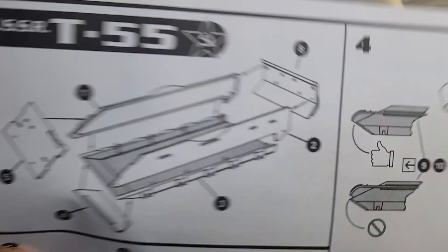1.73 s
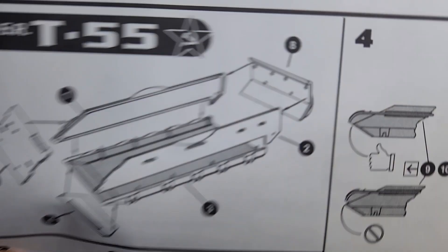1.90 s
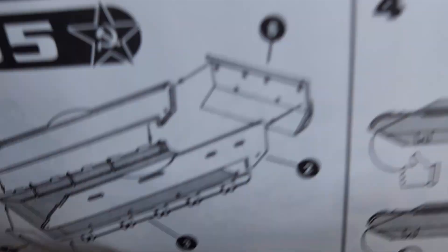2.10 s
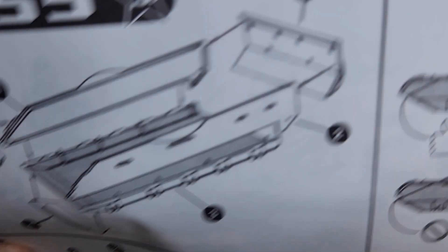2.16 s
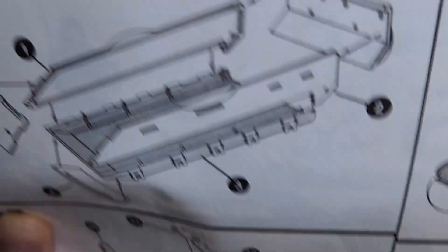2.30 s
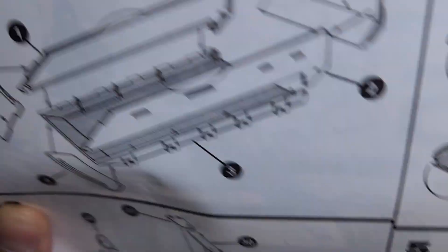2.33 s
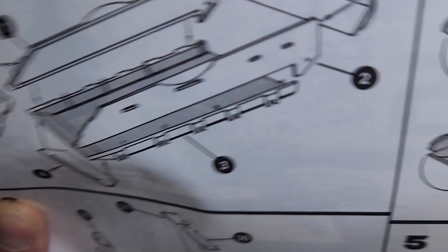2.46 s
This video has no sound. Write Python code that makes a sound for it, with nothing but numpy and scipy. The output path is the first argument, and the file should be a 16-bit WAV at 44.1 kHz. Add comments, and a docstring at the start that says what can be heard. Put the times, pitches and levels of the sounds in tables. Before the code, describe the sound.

Close paper scrapes softly, crackles and snaps loudly as it is opened, then settles into light finger rubbing in a quiet room.

```python
"""A folded paper sheet is handled close to two microphones in a quiet room.
First, fingers scrape softly over it, creases crackle and a taut panel hums, while the moving sheet
pushes low air over the room's faint hiss. From 1.4 s the rubbing grows firmer and panels buckle with
loud pops, in two bouts. After 4.3 s the fingers scrape lightly on the open, held sheet,
and a few last crackles come near 6.2 s."""
import sys
import numpy as np
from scipy import signal
from scipy.fft import rfft, irfft, next_fast_len
from scipy.io import wavfile
from scipy.ndimage import uniform_filter1d, map_coordinates

SR = 44100
rng = np.random.default_rng(int(sys.argv[2]) if len(sys.argv) > 2 else 0)


def wav_out(sig):
    """Save sig, one row per channel (or a flat mono array), as 16-bit PCM at SR to the path in sys.argv[1]."""
    wavfile.write(sys.argv[1], SR, np.round(np.clip(np.atleast_2d(sig).T, -1, 1) * 32767).astype(np.int16))


N = 282240
SIDES = np.array([[.5], [-.5]])  # splits a left-right difference between the two channels


def amp(db):
    return 10 ** (np.asarray(db) / 20)


def unit_rms(x):
    return x / np.sqrt(np.mean(x ** 2) + 1e-20)


def along(points, hz):
    """Read between (Hz, value) points on a log frequency axis."""
    f, v = np.transpose(points)
    return np.interp(np.log(hz + 1), np.log(f + 1), v)


def wobble(rate, count):
    """A smooth curve through `rate` random values a second."""
    knots = rng.standard_normal(int(count * rate / SR) + 4)
    return map_coordinates(knots, [np.arange(count) * rate / SR])


def filtered(x, response):
    """Scale and delay each frequency of x as `response` says."""
    m = next_fast_len(x.shape[-1] + 4096)
    return irfft(rfft(x, m) * response(np.fft.rfftfreq(m, 1 / SR)), m)[..., :x.shape[-1]]


def ring(f, hz, sharp):
    """One resonance, with gain 1 at its centre."""
    return 1j * f * hz / sharp / (hz * hz - f * f + 1j * f * hz / sharp)


def left_later(f, ms):
    return np.exp(-2j * np.pi * f * ms / 1000 * SIDES)


def spaced(pair, ms):
    """Two noises become a left and a right that are partly alike, the left ms later."""
    # Each row: frequency in Hz, how alike the sides are from 0 to 1.
    likeness = [(60, 0.87), (300, 0.88), (1000, 0.61), (4000, 0.14), (12000, 0.088)]
    turn = lambda f: np.arccos(np.clip(along(likeness, f), 0, 1)) / 2
    mid, side = filtered(pair, lambda f: np.array([np.cos(turn(f)), np.sin(turn(f))]))
    return filtered(np.array([mid + side, mid - side]), lambda f: left_later(f, ms))


def patchy(pair, db, size):
    """Make random patches of time and frequency louder or softer."""
    spectra = signal.stft(pair, nperseg=size)[2]
    patches = uniform_filter1d(uniform_filter1d(rng.standard_normal(spectra.shape[1:]), 3, 0), 6, 1)
    return signal.istft(spectra * amp(db * unit_rms(patches)), nperseg=size)[1][:, :pair.shape[1]]


def add(track, sound, start):
    place = track[:, max(round(start * SR), 0):][:, :sound.shape[1]]
    place += sound[:, :place.shape[1]]


def rub(times, scrape_db, fizz_db, sizzle_db, flex_db, pan_db):
    """Fibres catch and slip in clumps: a scrape, a bright fizz, a top sizzle and low flexing."""
    # Tone colours. Each row: frequency in Hz, gain in dB.
    folded_scrape = [(290, -35), (500, -10), (603, 1), (913, 0.5), (1410, 7), (1760, 2.5), (1930, 6.5),
                     (2510, -0.5), (3070, -11), (3320, -17.5), (3800, -15), (4940, -38), (8360, -120)]
    open_scrape = [(290, -42), (500, -16), (600, -9), (802, -3.5), (1010, -5.5), (1250, -1), (1430, 4),
                   (1620, -2), (2100, -3.5), (2570, -9.5), (2950, -8), (3500, -40), (5300, -45),
                   (11000, -120)]
    fizz = [(1880, -22), (3200, -5.5), (3690, -7.5), (4480, -2), (4980, -6), (5500, -4), (5900, -10),
            (6400, -6.5), (7460, -6), (8210, -8), (9500, -16.5), (12400, -36), (20900, -120)]
    sizzle = [(5590, -28), (9300, -11.5), (10000, -4), (11000, -1.5), (11900, 1.5), (15100, 3.5),
              (16100, -8), (16400, -18)]
    flex = [(82, -27), (140, -1.5), (227, -6), (367, -2), (415, -9), (800, -11), (1040, -36.5),
            (1760, -120)]
    # Where the fingers are. Each row: time in seconds, delay of the left side in ms.
    lags = [(0, .05), (.2, .35), (.67, .1), (.84, .4), (1.41, .4), (1.54, -.35), (1.59, .35), (3.4, .45),
            (3.66, -.1), (3.8, .18), (4.3, -.07), (4.9, .2), (5.1, -.08), (6.4, -.1)]
    # Bending tilts the scrape. Each row: time in seconds, boost of its highs against its lows in dB.
    tilts = [(0, -13), (.1, 1), (.4, 1), (.68, 0.5), (1.08, 4.5), (1.1, -15), (1.2, 5.5), (1.57, -3.5),
             (1.62, 1.5), (1.7, 1), (1.76, 3.5), (1.93, -2.5), (1.98, 1), (2.05, 2.5), (2.1, -1),
             (2.35, -1), (2.46, -2), (2.81, 4), (2.83, -4.5), (2.86, -8), (3.15, -1), (3.28, -3),
             (3.34, -3), (3.44, -1), (3.47, -6), (3.52, 0), (3.58, -3), (3.68, 1), (3.8, -8), (3.9, 7.5),
             (4.6, -1.5), (4.94, 1.5), (5.4, 0), (5.93, 0.5), (6.4, 0)]
    bite_s, lift_s, open_from_s, split_hz = .005, .045, 4.28, 1410
    start, end = times[0], times[-1]
    count = round((end - start) * SR) + 2048
    t = start + np.arange(count) / SR
    scrape_db, fizz_db, sizzle_db, flex_db = (
        np.interp(t, times, db) for db in (scrape_db, fizz_db, sizzle_db, flex_db))
    contact = np.clip((t - start) / bite_s, 0, 1) * amp(-60 * np.maximum(t - end, 0) / lift_s)
    force = np.clip((scrape_db + 68) / 35, .25, 1)  # a light touch slides, a firm one stutters
    clumps = amp(force * (.6 * wobble(60, count) + 1.1 * wobble(200, count) + 2.2 * wobble(900, count)))
    grit = patchy(unit_rms(clumps * rng.standard_normal((2, count))), db=1.3, size=256)
    grit = patchy(grit, db=3, size=1024)  # the bent sheet's resonances
    grit = spaced(grit, np.interp(start, *np.transpose(lags)))
    side_db = SIDES * pan_db
    scrape_colour = open_scrape if start > open_from_s else folded_scrape
    scrape = unit_rms(filtered(grit, lambda f: amp(along(scrape_colour, f))))
    lows = filtered(scrape, lambda f: 1 / (1 + (f / split_hz) ** 4))
    tilt = amp(np.interp(t, *np.transpose(tilts)) / 2)
    sound = amp(side_db) * (lows / tilt + (scrape - lows) * tilt)
    for colour, db, pan_share in (fizz, fizz_db, .38), (sizzle, sizzle_db, .21), (flex, flex_db, 1):
        layer = unit_rms(filtered(grit, lambda f: amp(along(colour, f))))
        sound += amp(db + pan_share * side_db) * layer
    return sound * contact * amp(scrape_db)


def rubbing():
    """Fingers and folds scrape the sheet in sudden strokes, over two long, light slides."""
    # Each row: start, crest and end in seconds, the scrape's level at each in dB, then fizz, sizzle
    # and flexing in dB over the scrape at the crest, left over right in dB.
    strokes = [ (0, 0.003, 0.089, -38, -51, -89, -8, -34, 4.5, 4),
               (0.091, .11, 0.13, -69, -70, -74, 1.5, -16, -6, -8),
               (.128, .13, 0.18, -49, -47.5, -89, -7, -24, -26, -6),
               (0.196, 0.27, 0.35, -57, -54, -85, -3.5, -26, -11, -5.5),
               (.392, 0.4, .46, -55, -52, -94, -5, -28, -20, -6),
               (0.466, .47, 0.6, -80, -78, -89, 6, -10, -4, 8),
               (0.611, 0.65, 0.69, -70, -52, -73, -9.5, -23, -13, -5),
               (0.668, 0.71, 0.71, -51, -48, -53, 2.5, -0.5, -5, -2.5),
               (0.71, 0.72, 0.75, -56, -57.5, -69, -7, -16, 3, -1),
               (.75, 0.79, 0.83, -71, -53, -79, -9.5, -25, 0.5, -4),
               (0.8361, 0.87, 0.91, -58, -48, -63.5, -2.5, -9.5, -3, -1.5),
               (.978, 0.96, 1, -52, -48.5, -58, -9, -15, -16, -4),
               (1.066, 1.075, 1.09, -45.5, -42, -50, -3, -19, -5.5, -4),
               (1.085, 1.1, 1.116, -49, -42.5, -46, -16, -23, 2, -4),
               (1.112, 1.25, 1.3, -55.5, -48.5, -61, 2.5, -4, -18, -3),
               (1.347, 1.385, 1.4, -46, -46.5, -52.5, 4, -2.5, -2, -0.5),
               (1.41, 1.444, 1.542, -45, -43, -59, -3.5, -10, -4.5, -3),
               (1.539, 1.57, 1.61, -38, -40, -44, -6, -14, -3.5, -2),
               (1.585, 1.625, 1.686, -26, -31.5, -38, -4, -12, -15.5, -2.5),
               (1.679, 1.698, 1.717, -32, -25.5, -33, -3.5, -15.5, -9, -4.5),
               (1.712, 1.74, 1.752, -34, -31.5, -30, -1.5, -12, -5, -3),
               (1.749, 1.782, 1.797, -28.5, -27.5, -28.5, 0, -8, -8, -1.5),
               (1.797, 1.8, 1.84, -32, -31.5, -40, -9.5, -16.5, -7.5, -2.5),
               (1.832, 1.87, 1.92, -39, -35.5, -52.5, -8, -16, -4, -5),
               (1.935, 1.953, 1.97, -39, -34.5, -36, -7, -11.5, -4, -2.5),
               (1.976, 1.988, 2.001, -27.5, -29.5, -31.5, 0, -10, -5.5, -2),
               (2.0, 2.002, 2.05, -38, -35.5, -42.5, -7.5, -15, -4.5, -2.5),
               (2.028, 2.042, 2.052, -42, -33.5, -37, -1.5, -11.5, -5.5, -2.5),
               (2.052, 2.05, 2.09, -47, -43.5, -50.5, -8, -21, 3, -3),
               (2.09, 2.12, 2.22, -55, -46.5, -60, -15, -24, 1.5, -6),
               (2.207, 2.27, 2.3, -50.5, -47.5, -55.5, 2, -3, -2, -4.5),
               (2.32, 2.323, 2.4, -35, -41, -67, 1.5, -6, -3.5, -4),
               (2.405, 2.45, 2.43, -67, -48.5, -63, 0, -10, 12.5, -4.5),
               (2.811, 2.825, 2.867, -33.5, -22, -60.5, -45, -52, -7, -10),
               (2.874, 2.866, 2.9, -51, -53, -67, -18, -18, 8, -2),
               (3.137, 3.18, 3.2, -50.5, -52.5, -69, 1.5, -9.5, -1, -12),
               (3.267, 3.274, 3.32, -23.5, -25, -35, -15, -28, -0.5, -4),
               (3.303, 3.34, 3.377, -30, -28, -31.5, -10, -20, -6.5, -6.5),
               (3.378, 3.43, 3.48, -40.5, -39, -48, -10, -18.5, -2.5, -3),
               (3.461, 3.466, 3.495, -30.5, -34, -43, -11, -24.5, -1.5, 6),
               (3.495, 3.514, 3.54, -23.5, -21.5, -26.5, -14, -25, -11, -4.5),
               (3.54, 3.595, 3.65, -32.5, -31.5, -43, -8.5, -15.5, -8.5, -3.5),
               (3.638, 3.676, 3.721, -40.5, -30.5, -38.5, -6, -15.5, -7, -3.5),
               (3.7, 3.725, 3.785, -46, -41, -54, -9, -18, -2, -3.5),
               (3.788, 3.802, 3.84, -45, -46.5, -58.5, 0.5, -4, 2, -1),
               (4.077, 4.127, 4.165, -54, -50, -62, 6.5, 5.5, -8.5, -3),
               (4.2, 4.26, 4.33, -66, -58, -60, 3.5, 1, -5, -4.5),
               (4.4, 4.57, 4.66, -62.5, -53, -71, -17, -26, -8, -2.5),
               (4.6, 4.66, 4.7, -63, -58, -61, -2, -18, -9.5, -2),
               (4.69, 4.765, 4.775, -63, -62, -70, -18, -35, -3, -2),
               (4.89, 4.9, 4.915, -62, -58, -58, -2, -9, -8, -3.5),
               (4.912, 4.925, 4.962, -50, -48.5, -53, -2, -9.5, -10.5, -3.5),
               (4.96, 4.987, 5.03, -60, -54, -72, 0, -7, -8, -3.5),
               (5.137, 5.2, 5.28, -64, -61, -62, -9, -32, -9, -2.5),
               (5.26, 5.295, 5.42, -64, -57.5, -61, -3, -28, -11, -2),
               (5.379, 5.385, 5.53, -55, -55.5, -58, -4, -20, -17, -2),
               (5.49, 5.54, 5.675, -59, -53.5, -58, -3, -25, -19, -1.5),
               (5.907, 5.93, 6.08, -64, -50.5, -52, -1, -11.5, -13.5, 0.5),
               (6.07, 6.105, 6.15, -58, -54, -66, -12, -22, -7.5, 0),
               (6.152, 6.2, 6.2, -53, -49.5, -53, -4.5, -10, -17, -1),
               (6.198, 6.222, 6.232, -51, -46.5, -49, 0, -14, -17.5, -8),
               (6.236, 6.3, 6.338, -57, -51, -53, -7, -17, -8.5, 0.5), ]
    # Each row of a slide: time in seconds, scrape in dB, then fizz, sizzle and flexing in dB over it.
    slides = [
        [(.86, -75, 2, -8, 13), (.91, -68.5, -6, -9, 12), (.97, -69.5, 3, -10, 2), (1.01, -62, 4, -5, -10),
         (1.3, -63.5, 1, -5, 2), (1.345, -68, 2, -2, -5), (1.89, -62, 1, -5, 0), (1.92, -66, 0, -9, 4),
         (1.95, -62, 2, -5, 0), (2.15, -62.5, 3.5, -8, 8), (2.19, -74, -7, -14, 13), (2.215, -65, 4, -5, 4),
         (2.4, -62.5, 7.5, -2, -2), (2.47, -56.5, 2, -3.5, 13.5), (2.657, -66.5, 4, -9, 3.5),
         (2.72, -63, 4.5, -4, -22), (2.9, -68.5, 6.5, 1.5, 2), (3.1, -75, 6.5, 1, -4.5),
         (3.13, -67.5, 3.5, -5, 8.5), (3.2, -79, -1, -6, 6), (3.235, -58.5, -0.5, -12, -5),
         (3.266, -55, 0, -9.5, -10)],
        [(3.8, -59.5, 6, -2, 0), (3.86, -58, 5, -2, -3), (4.0, -55, 6.5, -2, -18), (4.045, -55.5, 4, -3, -7),
         (4.056, -59.5, -10, -13, 0), (4.078, -62.5, 0, -12, 5.5), (4.165, -59.5, 10, 12, -8),
         (4.25, -64.5, 12, 7, -1.5), (4.38, -61, 4.5, 1, -18), (4.6, -72, 7.5, -5, -4.5),
         (4.72, -90, 1, -10, 0)],
    ]
    follows = (.84, .96, .66)  # how much of the scrape's swell fizz, sizzle and flexing share
    track = np.zeros((2, N))
    for *shape, fizz_db, sizzle_db, flex_db, pan_db in strokes:
        times, scrape_db = np.reshape(shape, (2, 3))
        times = np.maximum.accumulate(times)
        dip_db = scrape_db[1] - scrape_db
        layers_db = [db + (1 - share) * dip_db for db, share in zip((fizz_db, sizzle_db, flex_db), follows)]
        add(track, rub(times, scrape_db, *layers_db, pan_db), times[0])
    for rows in slides:
        add(track, rub(*np.transpose(rows), pan_db=-3.5), rows[0][0])
    return track


def air():
    """The swinging sheet pushes slow, lumpy waves of air at both microphones."""
    # The air's rumble. Each row: frequency in Hz, gain in dB.
    colour = [(12, -38.5), (20, -6), (36, 3), (59, 10), (92, 7.5), (135, 4), (200, -10), (260, -20),
              (440, -120)]
    # A constant stir. Each row: time in seconds, level in dB.
    stir_levels = [(0, -53.5), (.3, -59), (.9, -52.5), (1.3, -56), (1.5, -47), (2.3, -46), (2.6, -52.5),
                   (3.05, -57), (3.6, -49), (3.9, -55.5), (4.3, -54.5), (5.2, -58), (6.4, -57.5)]
    # Each row: crest in seconds, level in dB, seconds to swell by 20 dB, seconds to fade by 20 dB.
    swings = [(.87, -52, 0.075, .15), (1.1, -46.5, 0.27, 0.17), (1.37, -45.5, 0.049, 0.18),
              (1.7, -35.5, 0.15, 0.53), (1.81, -37, .4, 0.055), (1.98, -29, 0.03, .03),
              (2.1, -38.5, .06, 0.32), (2.16, -35, 0.15, .06), (2.44, -41.5, 0.16, 0.051),
              (2.831, -33, 0.055, 0.13), (3.18, -41.5, 0.19, 0.1), (3.31, -37.5, 0.11, 0.27),
              (3.37, -34, 0.084, 0.064), (3.5, -28, 0.041, 0.1), (3.76, -43, 0.16, 0.12),
              (4.3, -47, .1, 0.053), (4.87, -56, 0.083, .05)]
    rumble = filtered(spaced(rng.standard_normal((2, N)), ms=.05), lambda f: amp(along(colour, f)))
    t = np.arange(N) / SR
    stir = amp(np.interp(t, *np.transpose(stir_levels)) + 1.4 * wobble(13, N))
    wafts = [amp(db - 20 * np.maximum((crest - t) / swell, (t - crest) / fade))
             for crest, db, swell, fade in swings]
    strength = np.sqrt(stir ** 2 + np.sum(np.square(wafts), axis=0))
    return strength * amp(-2.4 * SIDES) * unit_rms(rumble)


def room_hiss():
    """The faint hiss of the quiet room."""
    # Each row: frequency in Hz, gain in dB.
    colour = [(88, -36.5), (150, -20), (179, -7.5), (414, -17.5), (1340, -24.5), (2180, -25), (3420, -33),
              (6500, -33), (7470, -26.5), (9440, -43), (11000, -43), (15700, -44)]
    hiss = patchy(rng.standard_normal((2, N)), db=2, size=256)
    return amp(-69.5) * unit_rms(filtered(hiss, lambda f: amp(along(colour, f))))


def crackles():
    """Fibres in a crease break in a quick, ragged run; the nearby panel and the whole sheet ring."""
    # Each row: start in seconds, level in dB, panel pitch in Hz, its sharpness, high crack in dB,
    # left over right in dB, rise in ms, delay of the left side in ms.
    creases = [(.003, -36.5, 696, 1.35, -31, -1, 9.6, 0.15), (.129, -43.5, 1820, 1.5, -29, -6, 4.3, 0.1),
               (.198, -40, 1800, 1.3, -18.5, -6.5, 2.4, 0.41), (0.241, -50, 1780, .6, -7, -2, 2.5, .33),
               (.395, -39, 1830, 2.9, -20, -9, 3.2, 0.37), (.641, -43.5, 1240, 3.7, -7, -6, 2.1, -0.09),
               (0.701, -37, 2360, 1.7, -10, -1, 3, 0.3), (0.8373, -39, 1500, 1, -1, 0, 1.4, 0.4),
               (.861, -36, 1400, 2.7, 6, -2, 3.1, 0.46), (1.07, -31.5, 2140, 3.3, 5, -7, 2.3, 0.63),
               (1.095, -31, 700, 1.6, -26, -4, 3.3, 0.49), (1.104, -32, 600, 1.8, -30, -4, 4, 0.39),
               (1.405, -31, 2000, .8, -3, -2, .9, -0.15), (1.541, -33, 1500, 1.2, -11, 1, 2, -0.27),
               (1.5826, 0.5, 3060, 2.8, -14, -0.5, 1.16, -0.32), (1.66, -27, 2000, 1.8, -14, -3, 2.8, 0.35),
               (1.682, -25, 2290, 1.8, -1.5, -2, 1.5, .35), (1.696, -24, 1770, 1.8, -1, 0, 3.9, .35),
               (1.731, -22, 1500, 1, -6, 0, 1.4, 0.23), (1.758, -18, 1730, 1.7, -3, 1, 1.3, 0.42),
               (1.792, -27, 2000, 1.5, -3, -1, 1.4, .36), (1.848, -34, 2000, 1.5, -8, -3.5, 2, 0.36),
               (1.9705, -3, 1696, 4.6, -4.5, 3, 2.4, -0.021), (1.986, -21, 3002, .86, 2.5, 3.5, 2.5, 0.39),
               (2.034, -30, 2390, 3.1, -20, -1, 6.5, 0.53), (2.105, -40, 5000, 1.1, -3, -3.5, 2.1, .44),
               (2.159, -35, 3920, 1.3, -5, -4, 1.8, 0.37),
               (2.3171, -13, 2400, 0.94, -6.5, -2, 1.13, -0.075), (2.429, -34, 405, 0.69, -22, 0, 3, 0.49),
               (2.816, -19.5, 734, 3.3, -48, -6, 6, 0.38), (3.139, -40, 1500, 1, -2, -8, 1.5, 0.56),
               (3.273, -28, 1500, 0.96, -12.5, -3.5, 1.8, .42), (3.496, -24, 2000, 0.9, -9, -1, 0.99, .2),
               (3.529, -22, 1700, 1.2, -10.5, -4, 2, .4), (3.568, -29, 1500, 1.6, -16, -3, 2.01, 0.4),
               (3.662, -22, 1370, 1, -10, 2, 3.7, -0.12), (4.553, -43, 894.5, 1.8, -28, -4, 7.4, 0.06),
               (4.985, -38, 2394, 1.52, 6, -5, 0.8, .08), (5.82, -59.5, 4953, 1.1, -5.5, -1, 2.51, -0.086),
               (6.138, -47, 5000, 1.1, -2, -1, 2.4, -0.061), (6.199, -40, 2000, 1.5, -1, -3, 1.6, -.09),
               (6.21, -29, 2120, 2.8, -6, -4.5, 1.5, -0.043), (6.2225, -31, 2000, 3, -11, -6, 1.7, -0.23)]
    crest_db = 7  # allows for peaks standing above the average level
    track, t = np.zeros((2, N)), np.arange(SR // 10) / SR - .002
    sheet = lambda f: amp(-9.5) * ring(f, hz=1140, sharp=1.6) ** 2
    crack = lambda f: ring(f, hz=6360, sharp=.75) ** 2
    for start, db, hz, sharp, crack_db, pan_db, rise_ms, lag_ms in creases:
        age = np.maximum(t, 0) * 1000 / rise_ms
        run = age ** 2 * np.exp(2 - 2 * age) + .47 * (1 - np.exp(-age)) * np.exp(-age / 4)
        breaks = run * rng.standard_normal((2, len(t))) * amp(3.5 * wobble(1200, len(t)))
        paper = lambda f: ring(f, hz, sharp / 2) ** 3 + sheet(f) + amp(crack_db) * crack(f)
        sound = unit_rms(filtered(spaced(breaks, lag_ms), paper)) * np.sqrt(rise_ms / 100)
        add(track, sound * amp(db - crest_db + SIDES * pan_db), start + t[0])
    return track


def thrums():
    """A taut panel, set going softly, hums one dying note."""
    # Each row: start in seconds, level in dB, seconds to fade by 60 dB.
    notes = [(.131, -41.5, 0.1), (0.201, -37, 0.071), (0.24, -45.5, 0.15)]
    pitch_hz, rise_s = 356, .0047
    track, t = np.zeros((2, N)), np.arange(SR // 5) / SR
    for start, db, fade_s in notes:
        envelope = amp(db - 60 * t / fade_s) * (1 - np.exp(-t / rise_s))
        tone = envelope * np.sin(2 * np.pi * pitch_hz * t)
        add(track, np.array([tone, tone]), start)
    return track


def pops():
    """A panel buckles in one clean kick, rings for about a cycle and shoves low air."""
    # Each row: time in seconds, the ring's peak in dB, its pitch in Hz, shove in dB over the ring,
    # left over right in dB, delay of the left side in ms.
    buckles = [(1.407, -25.5, 1494, -3.5, -2, -0.25), (1.5831, -6.5, 1150, -22, 0, -0.27),
               (1.9717, -9.5, 1403, -18, -3.5, -0.082), (2.3172, -17.5, 2400, -19, -1, -0.083),
               (3.2668, -0.5, 1160, -10, -2, 0.42), (3.3049, -14, 640, 1.5, -5.5, 0.48),
               (3.4617, -9.5, 740, -20, -3, 0.053), (3.496, -12, 760, 2.5, 0.5, 0.18),
               (4.174, -35, 601, 0.5, -4, 0.22)]
    track, kick = np.zeros((2, N)), np.zeros(SR // 8)
    lead = len(kick) // 4
    kick[lead] = 1
    for start, db, hz, push_db, pan_db, lag_ms in buckles:
        soft = lambda f: np.exp(-(f / hz / 2.4) ** 2) * left_later(f, lag_ms)
        flip = filtered(kick, lambda f: soft(f) * ring(f, hz, sharp=1.5))
        shove = filtered(kick, lambda f: soft(f) * ring(f, hz=210, sharp=.95))
        sound = flip / abs(flip).max() + amp(push_db) * shove / abs(shove).max()
        add(track, sound * amp(db + SIDES * pan_db), start - lead / SR)
    return track


def room_echo(x):
    """The room answers with a short echo whose highs die first."""
    # Each row: frequency in Hz, seconds to fade by 60 dB.
    fades = [(200, 0.2), (2000, 0.11), (10000, 0.042)]
    hz, t, spectra = signal.stft(rng.standard_normal((2, SR // 3)), SR, nperseg=256)
    tail = signal.istft(spectra * amp(-60 * t / along(fades, hz)[:, None]), SR, nperseg=256)[1]
    delayed = np.pad(x, ((0, 0), (120, 0)))
    return signal.fftconvolve(delayed, tail / np.linalg.norm(tail[0]), axes=1)[:, :N]


def scene():
    creases, rubs = pops() + crackles() + thrums(), rubbing()
    return creases + rubs + room_echo(amp(-15) * creases + amp(-23.5) * rubs) + air() + room_hiss()


def record(dry):
    """The loudest kicks flatten near full scale, and the highest treble is cut away."""
    # Each row: frequency in Hz, gain in dB.
    treble = [(15700, 0), (16100, -16), (16400, -30)]
    top_hz = 16400
    flattened = dry / (1 + abs(dry / .99) ** 8) ** (1 / 8)
    return filtered(flattened, lambda f: amp(along(treble, f)) * (f < top_hz))


dry = scene()
out = record(dry)
wav_out(out)
```